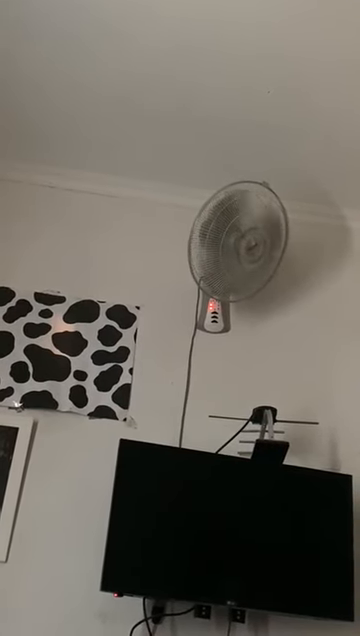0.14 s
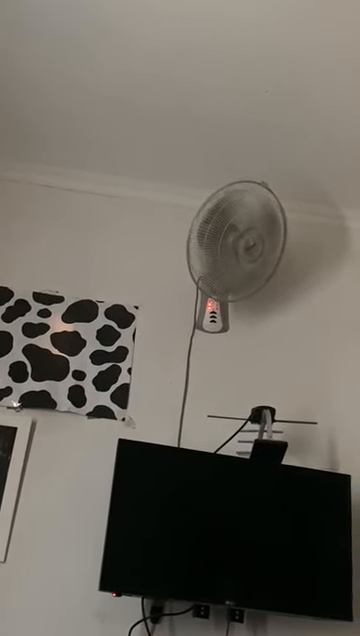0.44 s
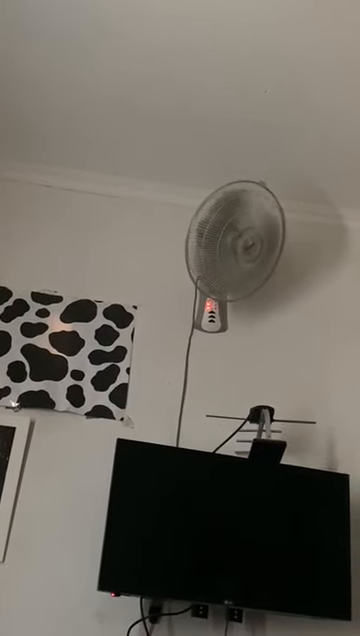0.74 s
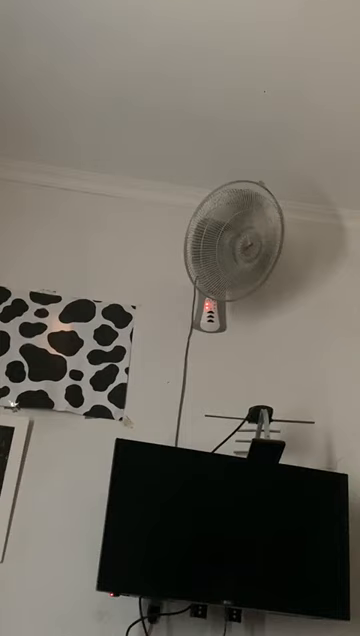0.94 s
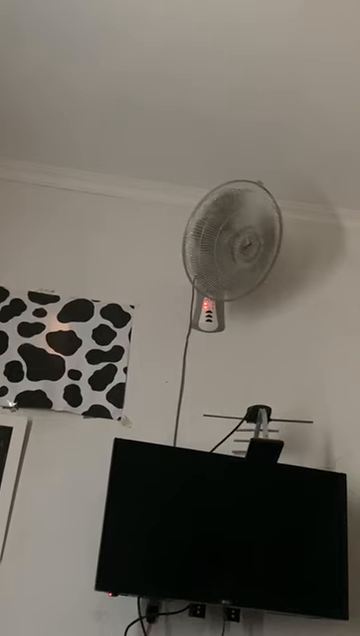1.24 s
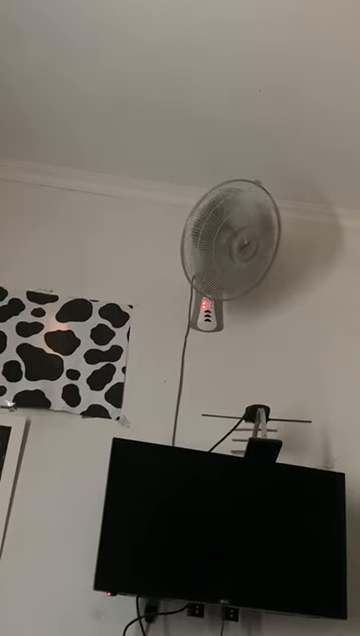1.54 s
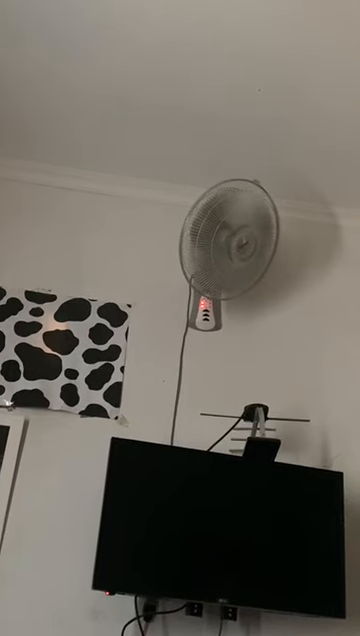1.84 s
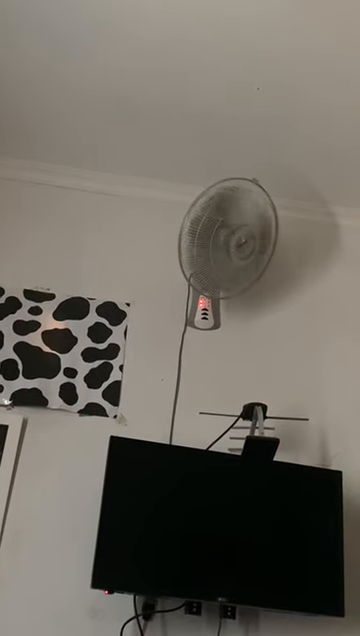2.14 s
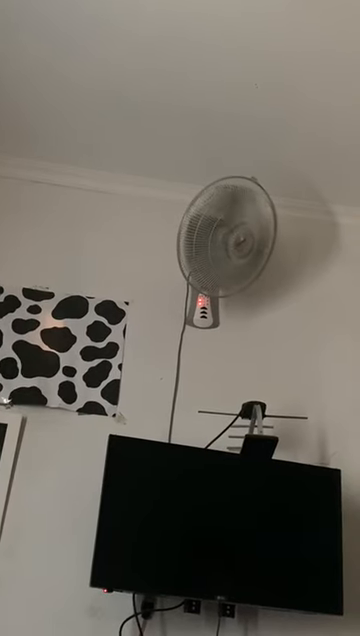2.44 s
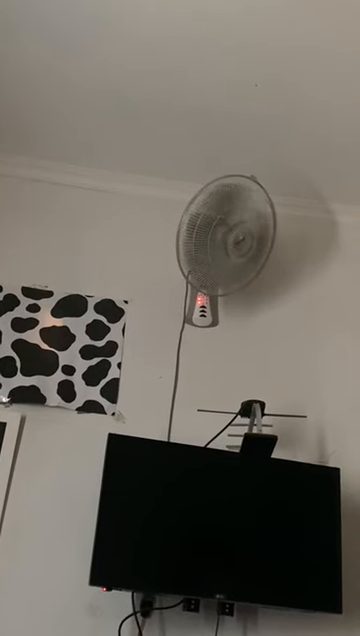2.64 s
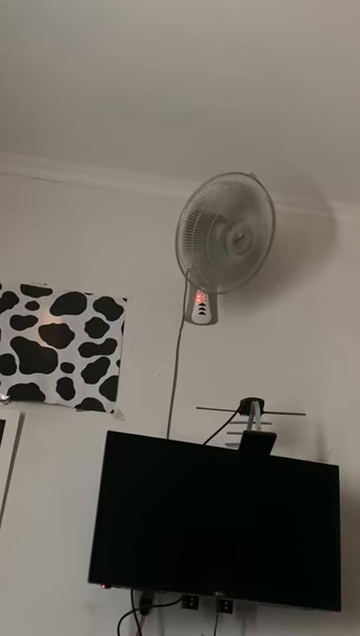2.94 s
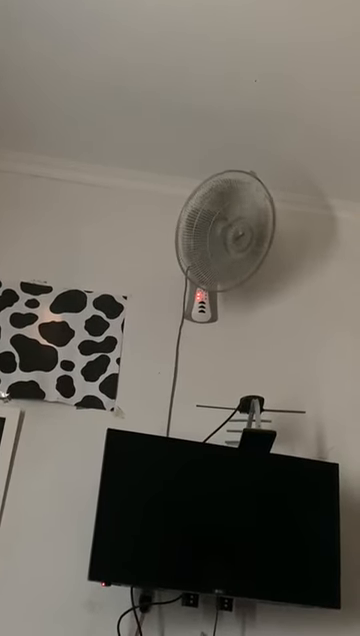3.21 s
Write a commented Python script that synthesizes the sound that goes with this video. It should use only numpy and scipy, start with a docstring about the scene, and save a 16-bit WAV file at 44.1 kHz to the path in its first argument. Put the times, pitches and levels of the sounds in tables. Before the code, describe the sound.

A wall fan runs throughout in a small room, buzzing low and throbbing, with soft rushing air and a pulsing dry plastic rattle that quickens; quiet stereo pickup by a pocket microphone.

```python
"""A throbbing electric buzz, with air, drone and rattle from the start; its throb quickens as a wall fan
gathers speed across a small room. The motor buzzes at twice the mains frequency; the turning, uneven rotor
splits each order into side tones. Air hisses through the cage over a low drone. For about half of each turn
loose housing parts chatter louder, as impulses that ring the housing; two brief surges of narrow noise swell.
Heard by a two-port pocket microphone, as mid (half-sum) and side (half-difference)."""
import sys
import numpy as np
from scipy import signal
from scipy.fft import rfft, irfft, next_fast_len
from scipy.io import wavfile
from scipy.ndimage import uniform_filter1d

SR = 44100
rng = np.random.default_rng(int(sys.argv[2]) if len(sys.argv) > 2 else 0)


def volts_from_db(level):
    """Convert decibel levels to linear amplitude ratios."""
    exponent = np.asarray(level, float) / 20
    return 10 ** exponent


def int16_out(signal):
    """Quantize to a 16-bit WAV file."""
    q = np.round(np.clip(np.atleast_2d(signal).T, -1, 1) * 32767)
    wavfile.write(sys.argv[1], SR, q.astype(np.int16))


N = 148617

# motor buzz, rms at full speed: order, level/dB at -3, -2, -1, 0, +1, +2, +3 shaft orders from it
BUZZ_TONES = [(1.0005, -75.5, -82, -78, -51, -75, -80, -81),
              (2.0043, -78.5, -85, -65.5, -66.5, -58, -81, -82),
              (3.001, -73.5, -80.5, -52.5, -69, -50.5, -73, -82),
              (4.0074, -72.5, -75, -65.5, -64.5, -62, -66, -74),
              (4.994, -66, -63, -56, -56.5, -56, -66.5, -72),
              (5.991, -76.5, -59.5, -60.5, -67.5, -69.5, -66.5, -81),
              (6.998, -78, -69, -65.5, -61, -58.5, -69.5, -69),
              (7.989, -69, -64, -65, -58, -66, -74.5, -75),
              (8.998, -63.5, -69, -60, -61, -61.5, -73.5, -70),
              (9.987, -76.5, -81, -64, -65.5, -74.5, -74.5, -86),
              (11.022, -73, -72.5, -73, -75, -67.5, -82, -87),
              (12.006, -81, -88, -88, -72.5, -77.5, -83, -92),
              (12.982, -80, -79.5, -73.5, -63, -87.5, -79.5, -81),
              (13.967, -95.5, -89.5, -86, -73.5, -84, -81, -78),
              (14.965, -78.5, -75, -74, -75.5, -79.5, -79, -87),
              (15.91, -86.5, -88.5, -84, -72, -78, -90, -88),
              (16.91, -88, -89.5, -87.5, -87, -73.5, -79, -89),
              (18.104, -80, -73.5, -83.5, -80, -76, -85, -77),
              (19.07, -70.5, -86.5, -74.5, -81.5, -75.5, -82.5, -85),
              (20.11, -88.5, -80, -74.5, -75.5, -91, -79.5, -78),
              (21.06, -85, -77, -81.5, -75.5, -69.5, -71, -74),
              (21.75, -87, -88.5, -88, -93.5, -91, -88, -90),
              (23.43, -94.5, -83, -86.5, -77.5, -82, -88.5, -81)]
# side tones: nominal order, shaft angle/turn where those at -3, -2, -1, +1, +2, +3 align with the steady one
THROB_ANGLES = [(1, 0.11, 0.09, 0.02, 0.11, 0.5, 0.26), (2, 0.02, 0.07, 0.55, 0.6, 0.44, 0.17),
                (3, 0.21, 0.16, 0.89, 0.03, 0.4, 0.02), (4, 0.14, 0.03, 0.86, 0.09, 0.4, 0.09),
                (5, 0.09, 0.12, 0.19, 0.81, 0.43, 0.14), (6, 0.33, 0.08, 0.92, 0.02, 0.13, 0.24),
                (7, 0.25, 0.13, 0.25, 0.4, 0.34, 0.27), (8, 0.05, 0.43, 0.56, 0.22, 0.23, 0.24),
                (9, 0.32, 0.19, 0.74, 0.72, 0.28, 0.21), (10, 0.21, 0.17, 0.45, 0.62, 0.23, 0.26),
                (11, 0.16, 0.29, 0.93, 0.1, 0.25, 0.31), (12, 0.23, 0.42, 0.96, 0.43, 0.18, 0.25),
                (13, 0.07, 0.38, 0.14, 0.96, 0.36, 0.03), (14, 0.3, 0.41, 0.98, 0.15, 0.15, 0.31),
                (15, 0.05, 0.14, 0.52, 0.4, 0.05, 0.15), (16, 0.05, 0.39, 0.83, 0.2, 0.32, 0.24),
                (17, 0.31, 0.01, 0.41, 0.74, 0.35, 0.23), (18, 0.11, 0.11, 0.64, 0.1, 0.12, 0.12),
                (19, 0.26, 0.06, 0.17, 0.44, 0.2, 0.3), (20, 0.27, 0.45, 0.98, 0.93, 0.35, 0.31),
                (21, 0.29, 0.43, 0.86, 0.89, 0.01, 0.06), (22, 0.1, 0.2, 0.59, 0.43, 0.41, 0.27),
                (23, 0.32, 0.44, 0.99, 0.08, 0.42, 0.31)]
# buzz side/mid ratio: f/Hz, in-phase part/1, random-phase part/dB
BUZZ_SIDE = [(103, 0.01, -38.5), (300, .11, -29), (490, 0.19, -25), (756, .2, -10), (930, 0.72, -12),
             (1150, 0.4, -6), (1350, .01, -6.5), (1610, .05, -15), (2300, 0.24, -10.5)]
# air spectrum, relative: f/Hz, density/dB per Hz
AIR_SPECTRUM = [(25, -38), (45, -4.5), (75, 1), (150, -5), (260, -10), (370, -11), (470, 1), (650, -8.5),
                (900, -5), (1150, -16), (1700, -17.5), (2500, -22), (4000, -20), (6000, -35.5), (8000, -37)]
# air side over mid: f/Hz, level/dB
AIR_SIDE_GAIN = [(25, -32), (100, -18), (300, -16), (700, -6), (1100, 0), (1700, -4), (3500, -23),
                 (5000, 0), (8000, 6.5)]
# loose parts struck once a buzz cycle: shaft angle/turn, angle sigma/turn, moment/cycle, relative level/dB
KNOCK_PARTS = [(0.913, 0.056, .9, 0.5), (0.885, 0.041, .15, -5.5), (0.16, 0.078, 0.054, -6.5),
               (0.035, 0.043, .75, -7.5), (0.23, 0.055, .4, -12)]
# knock resonances, mid and side: f/Hz, half-width/Hz, gain/dB
KNOCK_PEAKS = [(3940, 200, 7)]
KNOCK_SIDE_PEAKS = [(7300, 1300, 8)]
# rattle spectra, mid and side, relative: f/Hz, density/dB per Hz
RATTLE_SPECTRUM = [(880, -25), (1500, -9), (1690, -13), (1840, 0), (2060, -4), (2440, -13), (2620, -6),
                   (3520, -9), (3920, -5), (4480, -6), (5080, -11.5), (6030, -9.5), (6800, -21),
                   (8840, -45), (15000, -120)]
RATTLE_SIDE_SPECTRUM = [(2120, -48), (3600, -19), (4130, -62), (4300, -13), (4950, 7), (5440, -9.5),
                        (6150, 1.5), (10600, -5.5), (11600, -14), (15100, -42), (22000, -120)]
# housing resonances: f/Hz, half-width/Hz, gain/dB
HOUSING_PEAKS = [(1910, 54, -0.5), (2030, 70, 2), (3220, 130, 4.5), (3660, 160, -0.5), (5080, 180, -4.5),
                 (6140, 610, 5)]
# brief whirr surges: t/s, sigma/s, f/Hz, peak rms level/dB
WHIRR_SURGES = [(.97, 0.047, 848, -57.5), (1.757, .06, 915, -57)]
# treble cancelled in the sum of the ports: f/Hz, gain/dB
PORT_SUM_GAIN = [(6700, 0), (7500, -12), (9000, -30)]

FULL_SPEED_TURNS_PER_S, START_LACK_TURNS_PER_S, SETTLE_S, START_TURNS = 8.5099, 2.5975, 1.3949, .460
BUZZ_HZ, BUZZ_START_CYCLES = 100.135, -.041
BUZZ_WAVER_DB = 0.6
# level change, dB per unit of fractional speed lack
BUZZ_SLOW_DB, AIR_SLOW_DB, RATTLE_SLOW_DB, REST_SLOW_DB = -7.5, -5.5, -15, -15
AIR_DB, AIR_PATCHY_DB = -52.5, 3.5
DRONE_HZ, DRONE_DB, DRONE_WAVER_DB = 48.8, -60.5, 2.5
KNOCK_DB, KNOCK_SPREAD_DB, KNOCK_JITTER_S = -60.5, 0.5, .00015
CHATTER_DB, CHATTER_PER_S = -55, 2300
CHATTER_SPREAD_DB, CHATTER_MAX_SPREADS = 3.5, 3.5
CHATTER_OPEN_TURNS, CHATTER_SHUT_TURNS, CHATTER_EDGE_TURNS = 0.742, 0.29, 0.044
CHATTER_REST_DB, CHATTER_FADE_DB = -10, -2.5  # between spells; across a spell
TURN_SPREAD_DB = 0.9
ROOM_T60_S, ROOM_DB = 0.18, -5
SURGE_WIDTH_HZ = 25


def evened(x):
    """Scale to unit rms."""
    return x / np.sqrt(np.mean(x ** 2) + 1e-20)


def read(points, hz, column=1):
    """Interpolate a table column over log frequency."""
    table = np.array(points)
    return np.interp(np.log(hz + 1), np.log(table[:, 0] + 1), table[:, column])


def drift(rate_hz):
    """Slow chance of unit rms: random-phase sines up to rate_hz."""
    t = np.arange(0, N + 64, 64) / SR
    rates_hz = rate_hz * np.geomspace(.05, 1, 16)
    slow = sum(np.sin(2 * np.pi * (f * t + rng.random())) / np.sqrt(f) for f in rates_hz)
    return np.interp(np.arange(N) / SR, t, evened(slow))


def colour(x, points, peaks=()):
    """Minimum-phase filter with the given spectrum and resonant peaks."""
    hz = abs(np.fft.fftfreq(4096, 1 / SR))
    db = read(points, hz) + sum(d / (1 + ((hz - f) / w) ** 2) for f, w, d in peaks)
    log_gain = np.log(volts_from_db(np.maximum(db, -100)))
    response = np.exp(np.conj(signal.hilbert(log_gain)))
    impulse = np.fft.ifft(response).real[:2048]
    return signal.oaconvolve(x, impulse)[:N]


def shaft():
    """Speed nears full exponentially; returns turns made and fractional speed lack."""
    lack = START_LACK_TURNS_PER_S * np.exp(-np.arange(N) / SR / SETTLE_S)
    turns = START_TURNS + np.cumsum(FULL_SPEED_TURNS_PER_S - lack) / SR
    return turns, lack / FULL_SPEED_TURNS_PER_S


def motor_buzz(turns, lack):
    """Magnetic pull: each buzz order plus side tones at whole shaft orders, as mid and side."""
    t, steps = np.arange(N) / SR, np.arange(-3, 4)
    spins = np.exp(2j * np.pi * np.outer(steps, turns))
    mid, side = 0, 0
    for (order, *levels_db), (_, *angles) in zip(BUZZ_TONES, THROB_ANGLES):
        hz = order * BUZZ_HZ
        angles = np.insert(angles, len(angles) // 2, 0)
        phase_cycles = rng.random() - steps * angles
        size = np.sqrt(2) * volts_from_db(np.array(levels_db)) * np.exp(2j * np.pi * phase_cycles)
        scatter = np.exp(2j * np.pi * rng.random(len(steps)))
        side_ratio = read(BUZZ_SIDE, hz) + volts_from_db(read(BUZZ_SIDE, hz, column=2)) * scatter
        tone = np.exp(2j * np.pi * hz * t) * volts_from_db(BUZZ_WAVER_DB * drift(rate_hz=4.7))
        mid = mid + (tone * (size @ spins)).real
        side = side + (tone * ((size * side_ratio) @ spins)).real
    return volts_from_db(BUZZ_SLOW_DB * lack) * np.array([mid, side])


def air(lack):
    """Rush through the cage: noise with level patches in time and frequency, as mid and side."""
    frames, hz = N // 512 + 5, np.fft.rfftfreq(2048, 1 / SR)
    real, imag, patches = rng.standard_normal((3, 2, 1025, frames))
    patches = uniform_filter1d(patches[0], 8, 0)
    patches = evened(uniform_filter1d(patches, 6, 1))
    spectra = (real + 1j * imag) * volts_from_db(read(AIR_SPECTRUM, hz)[:, None] + AIR_PATCHY_DB * patches)
    spectra[1] *= volts_from_db(read(AIR_SIDE_GAIN, hz))[:, None]
    rush = signal.istft(spectra, nperseg=2048, noverlap=1536)[1][:, :N]
    return volts_from_db(AIR_DB + AIR_SLOW_DB * lack) * rush / np.std(rush[0])


def drone():
    """Low room tone: a sine of fixed frequency and wavering level."""
    level = np.sqrt(2) * volts_from_db(DRONE_DB + DRONE_WAVER_DB * drift(rate_hz=5.5))
    return level * np.sin(2 * np.pi * DRONE_HZ * np.arange(N) / SR)


def angle_from(turns, centre):
    """Signed shaft angle from centre, -0.5 to 0.5 turn."""
    return (turns - centre + .5) % 1 - .5


def chatter_strikes(turns, lack):
    """Loose parts hit at random: sparse impulses of either sign, louder in one span of shaft angle."""
    span = 1 + CHATTER_SHUT_TURNS - CHATTER_OPEN_TURNS
    off = angle_from(turns, (CHATTER_OPEN_TURNS + 1 + CHATTER_SHUT_TURNS) / 2)
    gate = .5 + .5 * np.tanh((span / 2 - abs(off)) / CHATTER_EDGE_TURNS)
    rest_db = (CHATTER_REST_DB + REST_SLOW_DB * lack) * (1 - gate)
    fade_db = CHATTER_FADE_DB * gate * off / span
    size = volts_from_db(CHATTER_SPREAD_DB * np.minimum(rng.exponential(1, N), CHATTER_MAX_SPREADS))
    hits = rng.choice([-1, 1], N) * (rng.random(N) < CHATTER_PER_S / SR)
    return volts_from_db(CHATTER_DB + rest_db + fade_db) * evened(size * hits)


def knock_strikes(turns):
    """Each part is struck once a buzz cycle, weighted by a Gaussian in shaft angle."""
    cycles, knocks = np.arange(1, int(N / SR * BUZZ_HZ) - 1), np.zeros(N)
    for angle, width, moment, db in KNOCK_PARTS:
        late, size = rng.standard_normal((2, len(cycles)))
        at_s = (cycles + moment - BUZZ_START_CYCLES) / BUZZ_HZ + KNOCK_JITTER_S * late
        at = (at_s * SR).astype(int).clip(0, N - 1)
        weight = np.exp(-.5 * (angle_from(turns[at], angle) / width) ** 2)
        np.add.at(knocks, at, volts_from_db(db + KNOCK_SPREAD_DB * size.clip(-2, 2)) * weight)
    return volts_from_db(KNOCK_DB) * evened(knocks)


def room(x):
    """Direct sound plus an exponentially decaying tail of sparse random-sign taps."""
    at = np.arange(60, SR // 2, 20)
    tail = np.zeros(SR // 2 + 20)
    taps = rng.choice([-1, 1], len(at)) * volts_from_db(-60 * at / SR / ROOM_T60_S)
    tail[at + rng.integers(0, 20, len(at))] = taps
    return x + volts_from_db(ROOM_DB) * signal.oaconvolve(x, tail / np.linalg.norm(tail))[:N]


def rattle(turns, lack):
    """Strikes ring the housing in the room; the side is turned by a quarter cycle."""
    per_turn = rng.standard_normal(40)[(turns + .5).astype(int)]
    gain = volts_from_db(RATTLE_SLOW_DB * lack + TURN_SPREAD_DB * per_turn)
    chatter = chatter_strikes(turns, lack) * gain
    knocks = knock_strikes(turns) * gain
    # one-point spectra are flat gains/dB
    mid = room(chatter + colour(knocks, [(1, -2.5)], KNOCK_PEAKS))
    mid = colour(mid, RATTLE_SPECTRUM, HOUSING_PEAKS)
    side = room(chatter + colour(knocks, [(1, -6.5)], KNOCK_SIDE_PEAKS))
    side = colour(side, RATTLE_SIDE_SPECTRUM)
    side = signal.hilbert(side, next_fast_len(N)).imag[:N]
    return np.std(knocks + chatter) * np.array([evened(mid), evened(side)])


def surges():
    """Whirr surges: noise through a two-pole resonator under a Gaussian swell."""
    t, out = np.arange(N) / SR, 0
    radius = np.exp(-np.pi * SURGE_WIDTH_HZ / SR)
    for at_s, sigma_s, hz, db in WHIRR_SURGES:
        poles = [1, -2 * radius * np.cos(2 * np.pi * hz / SR), radius * radius]
        band = signal.lfilter([1], poles, rng.standard_normal(N))
        out = out + volts_from_db(db) * evened(band) * np.exp(-.5 * ((t - at_s) / sigma_s) ** 2)
    return out


def scene():
    """Sum the sources, cancel mid treble at the ports, form left and right."""
    turns, lack = shaft()
    mid, side = motor_buzz(turns, lack) + air(lack) + rattle(turns, lack)
    mid = mid + drone() + surges()
    port_gain = volts_from_db(read(PORT_SUM_GAIN, np.fft.rfftfreq(N, 1 / SR)))
    mid = irfft(rfft(mid) * port_gain, N)
    return np.array([mid + side, mid - side])


def band_limit(x):
    """A steep low-pass at the top of the band."""
    return signal.sosfilt(signal.butter(12, 11790, fs=SR, output="sos"), x)


def record(dry):
    """Deliver the finished stereo mix."""
    return band_limit(dry)


dry = scene()
out = record(dry)
int16_out(out)
```